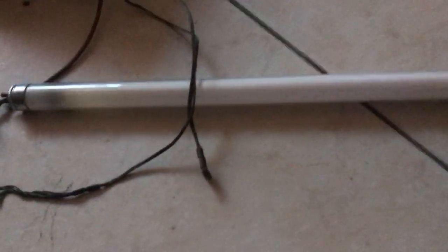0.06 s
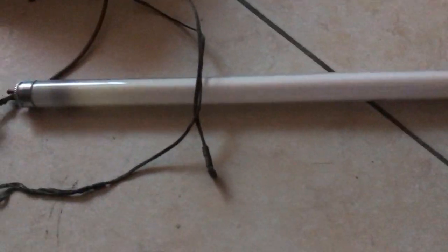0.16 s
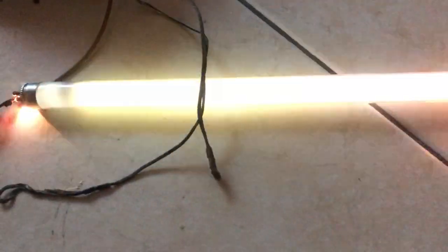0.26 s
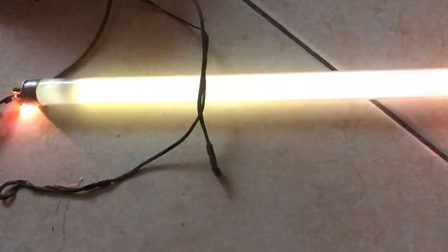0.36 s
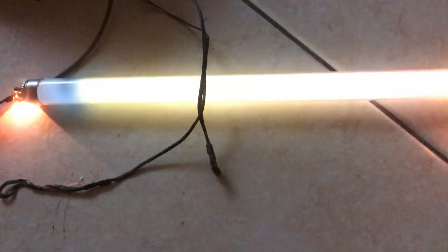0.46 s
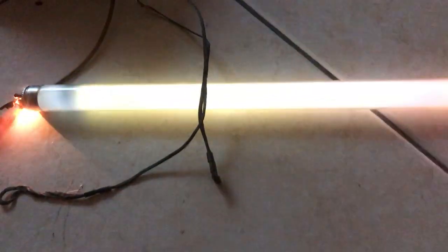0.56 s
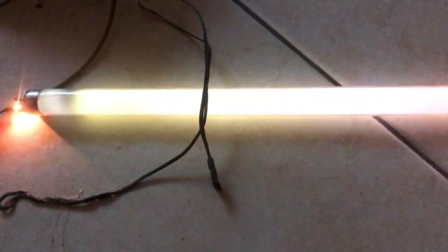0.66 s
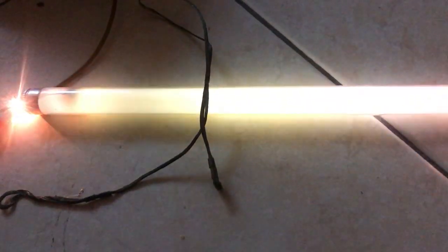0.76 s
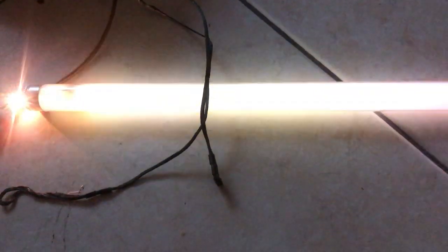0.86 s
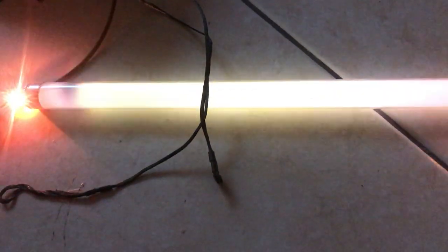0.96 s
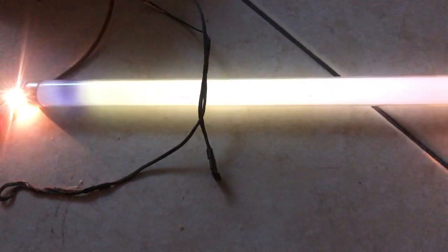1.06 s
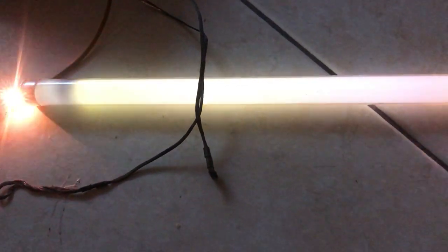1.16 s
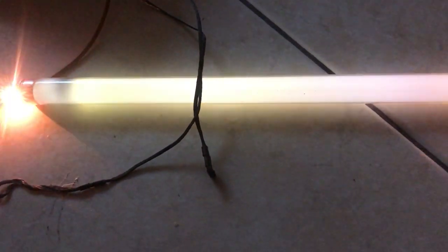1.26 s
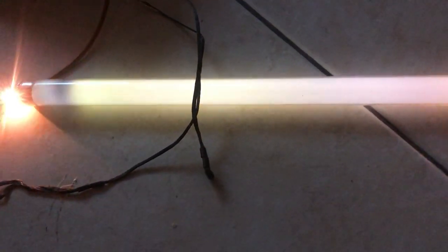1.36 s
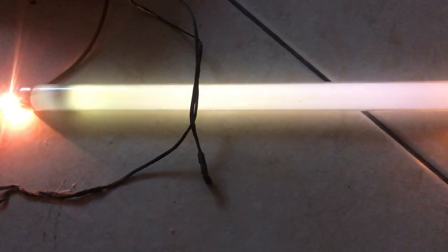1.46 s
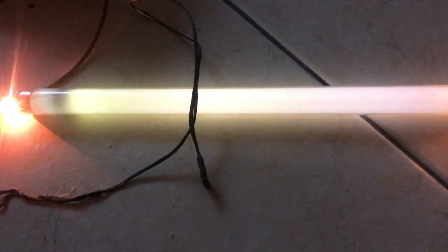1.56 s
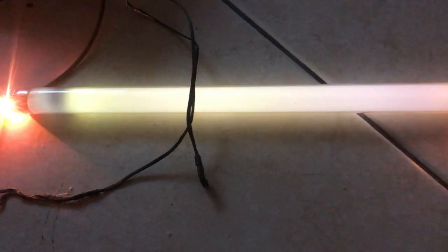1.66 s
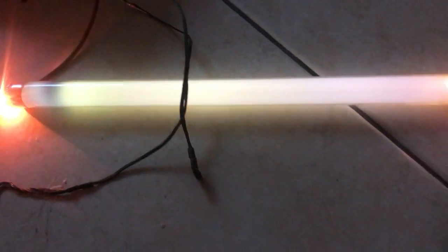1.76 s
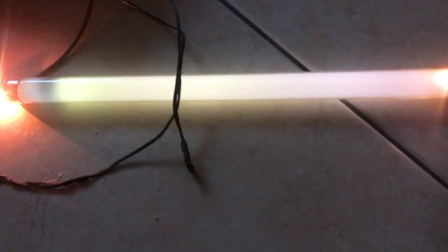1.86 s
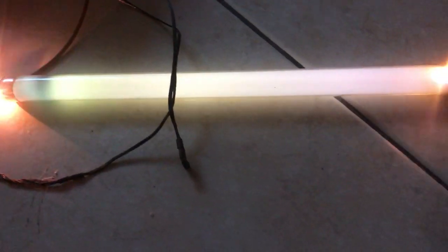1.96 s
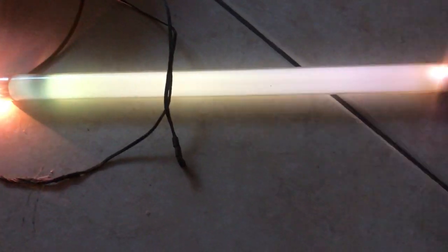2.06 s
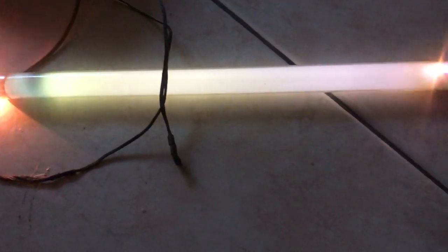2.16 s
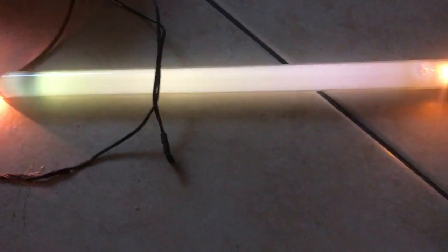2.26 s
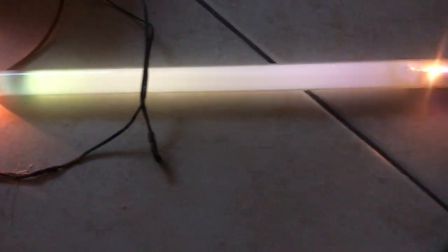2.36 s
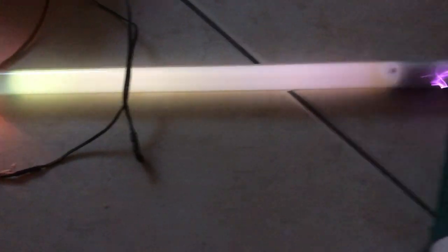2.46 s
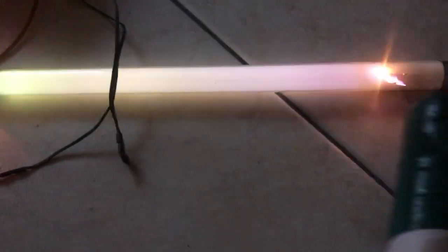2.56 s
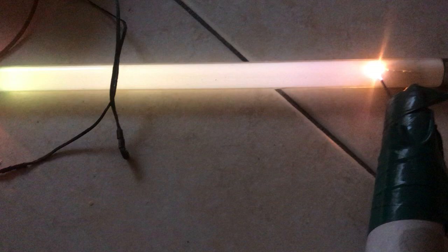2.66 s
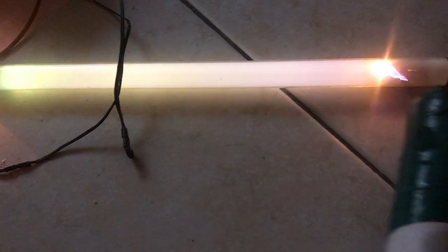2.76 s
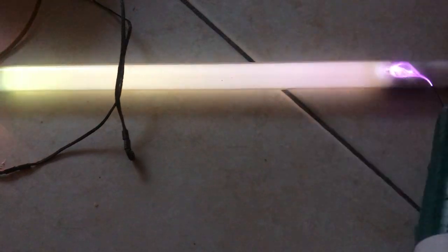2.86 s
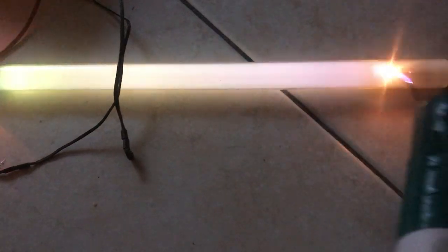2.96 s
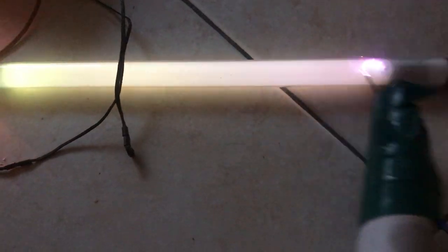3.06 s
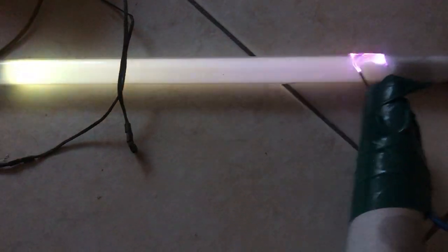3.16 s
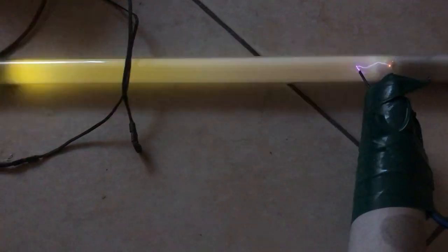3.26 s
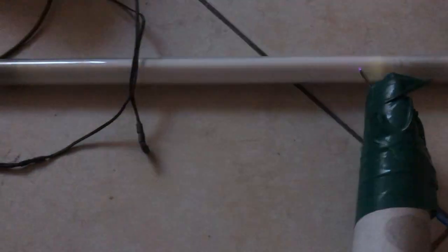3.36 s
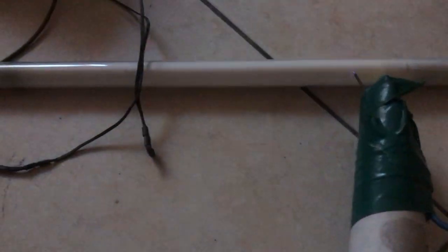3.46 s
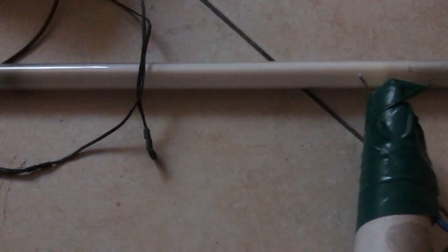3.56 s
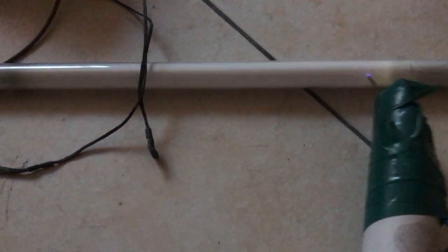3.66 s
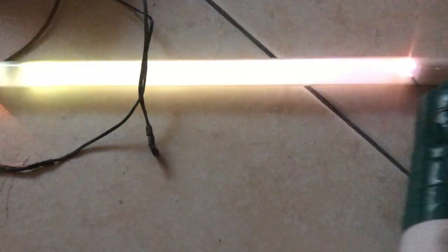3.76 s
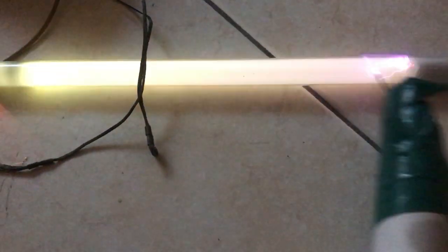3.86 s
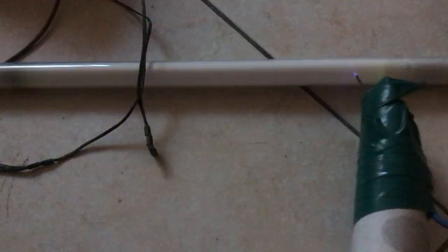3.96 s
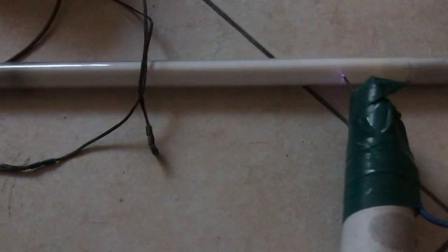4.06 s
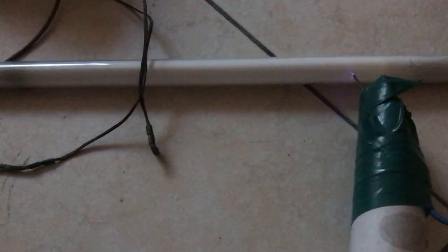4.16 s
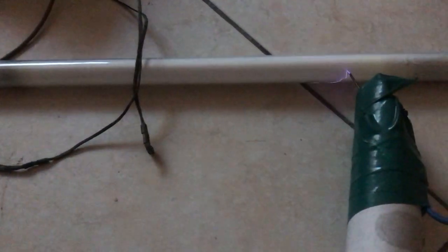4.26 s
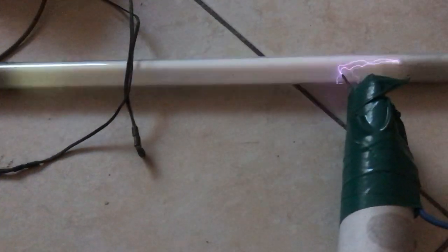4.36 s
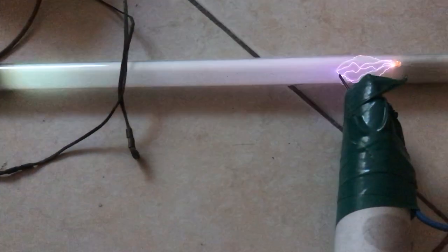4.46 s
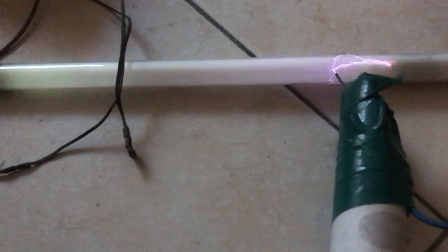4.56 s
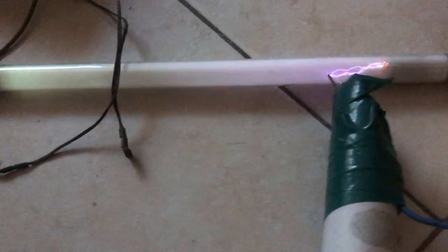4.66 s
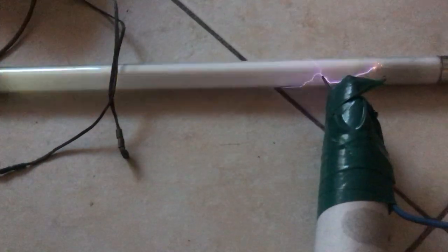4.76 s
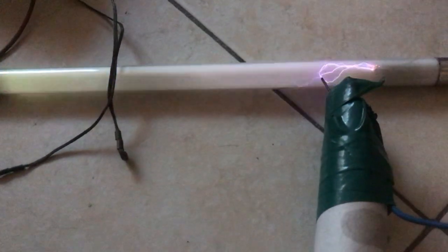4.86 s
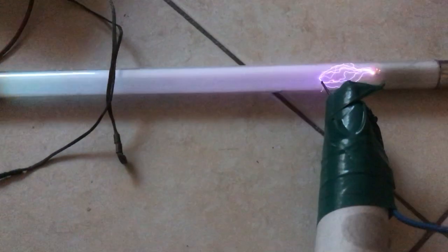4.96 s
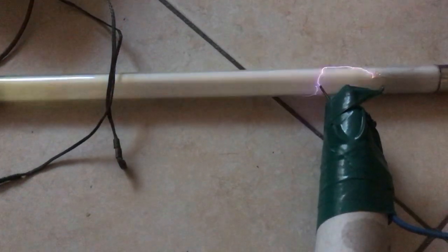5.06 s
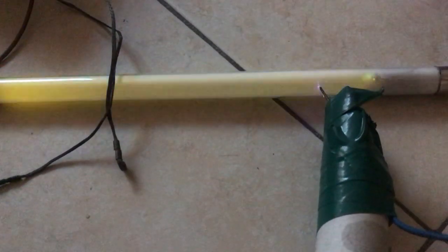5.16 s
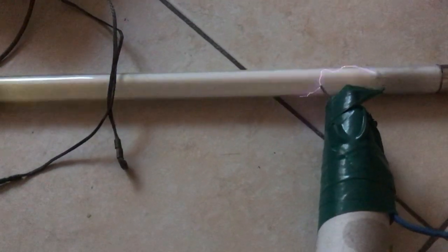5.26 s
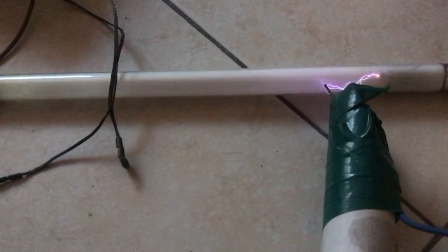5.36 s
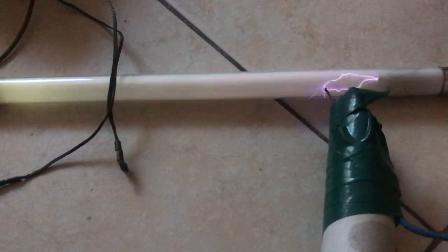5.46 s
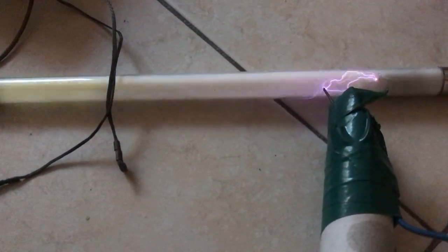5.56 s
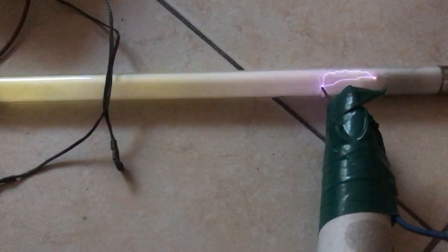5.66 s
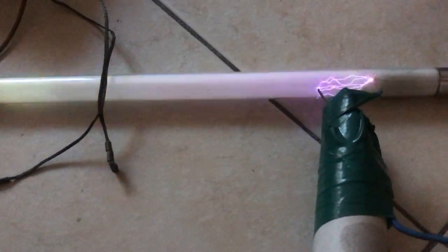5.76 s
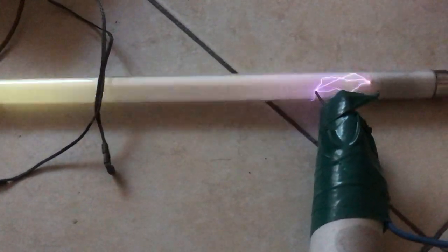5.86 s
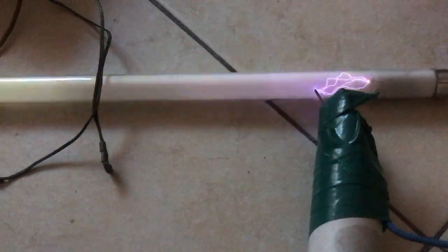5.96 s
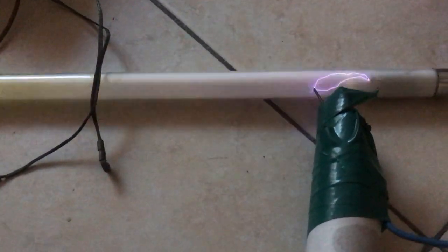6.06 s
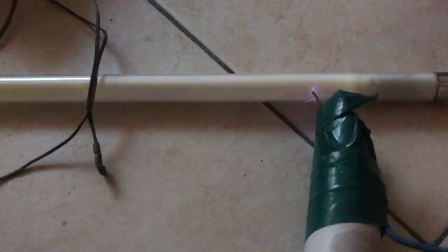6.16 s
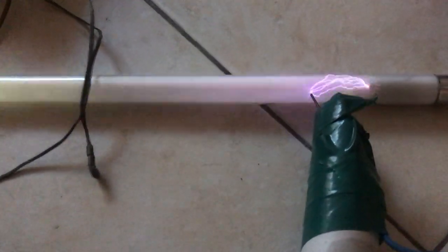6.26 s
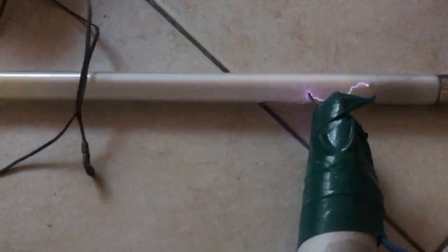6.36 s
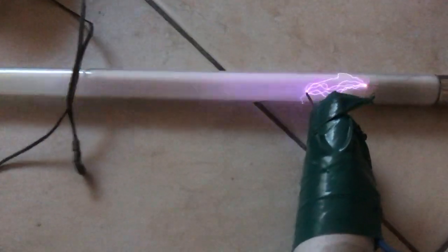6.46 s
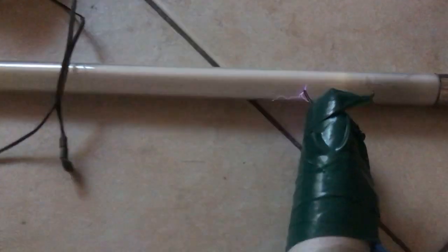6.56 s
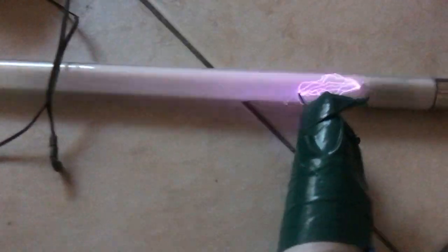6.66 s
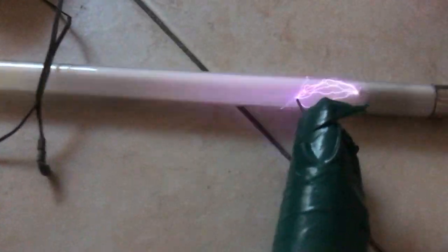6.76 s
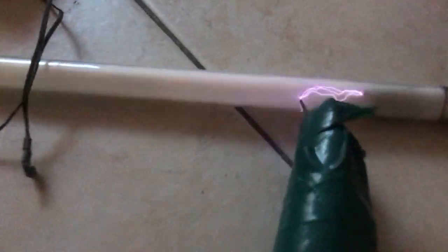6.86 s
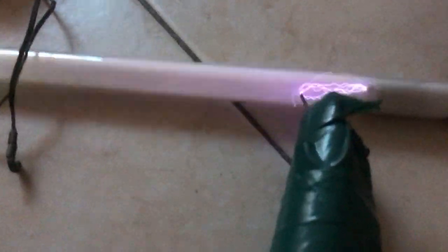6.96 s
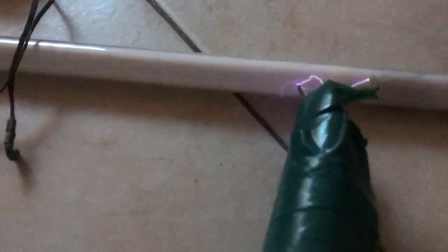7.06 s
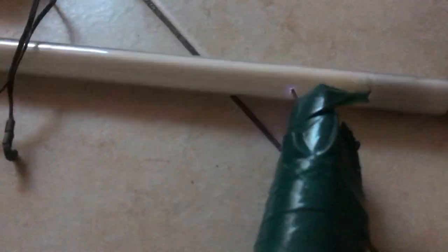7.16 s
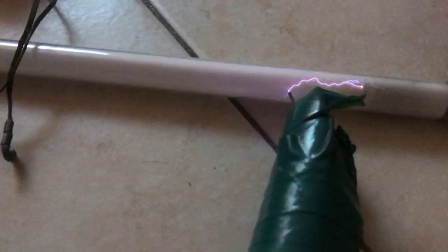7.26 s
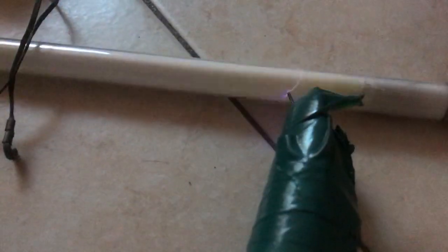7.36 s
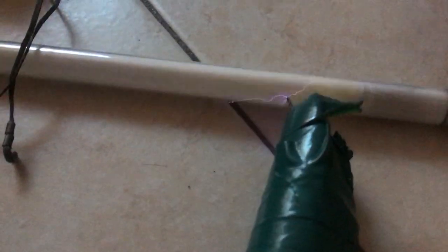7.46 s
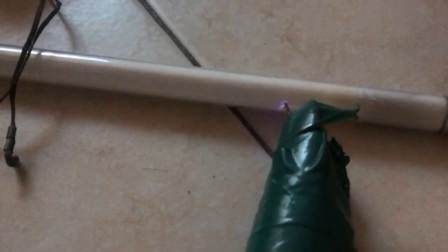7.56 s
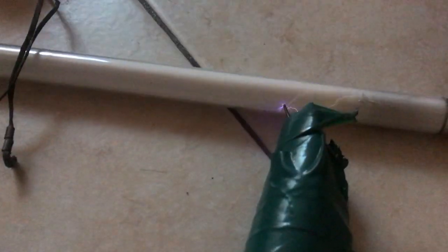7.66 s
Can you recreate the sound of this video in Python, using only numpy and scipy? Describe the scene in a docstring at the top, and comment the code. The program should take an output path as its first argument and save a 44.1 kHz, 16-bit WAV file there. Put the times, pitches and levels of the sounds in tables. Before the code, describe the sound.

A high-voltage wire is held to a glass lamp tube on a tiled floor. After a faint hiss, an arc strikes with a snap and sizzles with a thin, high whine. It swells, breaks off and returns for a moment. Then sharp sparks snap along the glass in fast, uneven volleys that grow thicker. The sound is close, with a short, hard room echo and faint creaks from the hand-held camera.

```python
"""A high-voltage lead held to a glass lamp tube on a tiled floor, heard close from a hand-held camera.
Corona hisses at the wire tip; then an arc strikes, sizzles and sings at the supply's switching frequency
and at fractions of it. It breaks off near 3.4 s and returns briefly. From 4.2 s sparks snap along the
glass in thickening volleys. The hard room answers each snap, and the camera body creaks in the hand."""
import sys
import numpy as np
from scipy import signal
from scipy.fft import rfft, irfft, next_fast_len
from scipy.io import wavfile
from scipy.ndimage import uniform_filter1d, minimum_filter1d, map_coordinates

SR = 44100
rng = np.random.default_rng(int(sys.argv[2]) if len(sys.argv) > 2 else 0)


def materialize(psi):
    """Save the field psi as 16-bit PCM at rate SR to the path in sys.argv[1].

    A 1-D psi becomes a single channel; in a 2-D psi each row is a channel.
    """
    bounded = np.clip(np.atleast_2d(psi).T, -1, 1)
    quanta = np.round(bounded * 32767).astype(np.int16)
    wavfile.write(sys.argv[1], SR, quanta)


N = 339551

# spark volleys along the glass: start_s, relative_level_db, length_ms
VOLLEYS = [(0.3135, -5.0, 4.0), (0.3203, -5.0, 4.2), (2.3024, -12.0, 1.0), (2.3146, -15.0, 0.0),
           (2.5104, -15.0, 0.0), (2.5151, -12.0, 0.3), (2.5436, -6.0, 1.7), (2.9366, -11.0, 0.0),
           (2.9674, -13.0, 0.0), (2.9694, -10.0, 2.0), (3.1846, -11.0, 0.0), (3.193, -6.0, 0.0),
           (3.2083, -6.0, 0.0), (3.212, -8.0, 0.6), (3.2144, -8.0, 0.0), (3.2221, -8.0, 0.0),
           (3.2269, -5.0, 0.0), (3.233, -5.0, 0.4), (3.2363, -4.0, 0.4), (3.2487, -9.0, 0.0),
           (3.2567, -4.0, 0.0), (3.2604, -6.0, 0.0), (3.2668, -9.0, 0.0), (3.2872, -11.0, 0.0),
           (3.3185, -9.0, 0.0), (3.3231, -10.0, 0.0), (3.3289, -9.0, 0.0), (3.3339, -8.0, 0.0),
           (3.339, -10.0, 0.0), (3.3434, -12.0, 0.0), (3.3493, -9.0, 0.4), (3.3524, -11.0, 1.5),
           (3.3606, -7.0, 0.0), (3.3729, -6.0, 0.0), (3.8124, -3.0, 11.9), (3.9788, -4.0, 2.4),
           (4.1956, -13.0, 0.0), (4.2186, -11.0, 0.0), (4.2454, -17.0, 0.0), (4.2898, -9.0, 0.0),
           (4.312, -15.0, 0.0), (4.3234, -11.0, 0.0), (4.346, -8.0, 0.0), (4.375, -4.0, 0.0),
           (4.4018, -6.0, 0.0), (4.4359, -4.0, 1.0), (4.4487, -4.0, 0.0), (4.4695, -5.0, 0.4),
           (4.4828, -4.0, 0.0), (4.4984, -11.0, 0.0), (4.5139, -4.0, 1.1), (4.5246, -4.0, 0.6),
           (4.5374, -5.0, 0.0), (4.5481, -12.0, 0.0), (4.5592, -5.0, 0.0), (4.5644, -5.0, 0.0),
           (4.5796, -3.0, 1.9), (4.5924, -5.0, 0.0), (4.603, -9.0, 0.0), (4.6247, -7.0, 0.0),
           (4.6298, -8.0, 0.0), (4.6567, -7.0, 0.0), (4.6704, -4.0, 0.0), (4.6803, -4.0, 1.2),
           (4.6905, -3.0, 0.0), (4.7168, -8.0, 0.0), (4.7316, -5.0, 1.8), (4.7466, -4.0, 0.0),
           (4.7568, -7.0, 0.0), (4.7732, -5.0, 0.0), (4.7798, -3.0, 0.9), (4.7978, -10.0, 0.0),
           (4.8201, -6.0, 0.0), (4.8719, -5.0, 0.6), (4.8896, -4.0, 0.7), (4.9, -3.0, 0.5),
           (4.9171, -4.0, 1.0), (4.9361, -3.0, 1.0), (4.9479, -6.0, 0.0), (4.9584, -14.0, 0.0),
           (4.9695, -4.0, 1.3), (4.9863, -6.0, 0.0), (4.9927, -10.0, 0.0), (5.0187, -3.0, 0.0),
           (5.0298, -4.0, 0.0), (5.0517, -3.0, 0.0), (5.0631, -12.0, 0.0), (5.0766, -7.0, 0.0),
           (5.0831, -4.0, 2.3), (5.1024, -4.0, 0.0), (5.1259, -8.0, 0.0), (5.133, -11.0, 0.0),
           (5.1472, -7.0, 0.0), (5.157, -4.0, 0.6), (5.1644, -6.0, 0.0), (5.1809, -4.0, 1.6),
           (5.2195, -9.0, 0.4), (5.2309, -4.0, 0.0), (5.2567, -4.0, 7.5), (5.2921, -12.0, 0.0),
           (5.2976, -6.0, 0.0), (5.3154, -3.0, 1.0), (5.328, -3.0, 0.0), (5.3502, -4.0, 1.3),
           (5.3698, -9.0, 0.0), (5.384, -8.0, 0.0), (5.4054, -3.0, 0.7), (5.4194, -5.0, 0.0),
           (5.4274, -9.0, 0.4), (5.4436, -10.0, 0.0), (5.4674, -3.0, 0.0), (5.4771, -4.0, 0.0),
           (5.4977, -4.0, 0.0), (5.5082, -3.0, 4.0), (5.5221, -11.0, 0.0), (5.5348, -5.0, 0.5),
           (5.548, -4.0, 0.0), (5.5569, -4.0, 0.4), (5.5712, -4.0, 1.1), (5.5863, -3.0, 0.0),
           (5.594, -4.0, 1.1), (5.6074, -5.0, 0.0), (5.6167, -4.0, 1.2), (5.6459, -4.0, 0.6),
           (5.6507, -5.0, 0.5), (5.6656, -4.0, 0.0), (5.6673, -4.0, 0.0), (5.6809, -4.0, 0.4),
           (5.6902, -11.0, 0.0), (5.6946, -6.0, 0.0), (5.7014, -4.0, 0.9), (5.7191, -4.0, 1.3),
           (5.733, -12.0, 0.0), (5.7395, -4.0, 2.7), (5.7528, -4.0, 0.0), (5.7596, -5.0, 0.0),
           (5.7624, -5.0, 0.5), (5.7796, -4.0, 1.5), (5.7868, -5.0, 0.5), (5.7892, -11.0, 0.0),
           (5.8026, -5.0, 1.4), (5.8064, -4.0, 1.5), (5.814, -12.0, 0.0), (5.8267, -4.0, 1.3),
           (5.8379, -4.0, 0.0), (5.8425, -6.0, 0.0), (5.8671, -5.0, 0.9), (5.8806, -5.0, 0.6),
           (5.8859, -4.0, 0.0), (5.8977, -3.0, 0.7), (5.9109, -3.0, 3.0), (5.9161, -3.0, 2.9),
           (5.9281, -3.0, 0.5), (5.9379, -6.0, 0.0), (5.9439, -4.0, 4.7), (5.956, -5.0, 0.0),
           (5.9669, -5.0, 0.0), (5.9723, -5.0, 0.9), (5.9873, -5.0, 1.7), (6.0001, -6.0, 0.0),
           (6.0028, -4.0, 2.1), (6.0108, -4.0, 0.0), (6.0143, -7.0, 0.0), (6.0165, -4.0, 0.8),
           (6.0259, -5.0, 0.8), (6.0316, -5.0, 2.2), (6.0442, -4.0, 0.0), (6.0527, -7.0, 0.0),
           (6.0572, -12.0, 0.0), (6.0723, -3.0, 1.5), (6.0868, -3.0, 2.4), (6.0973, -5.0, 0.0),
           (6.1269, -4.0, 0.0), (6.1374, -8.0, 0.0), (6.1503, -3.0, 2.1), (6.1722, -6.0, 0.0),
           (6.1758, -4.0, 0.0), (6.1931, -11.0, 0.0), (6.2022, -5.0, 1.0), (6.2105, -4.0, 0.8),
           (6.222, -14.0, 0.0), (6.2381, -13.0, 0.0), (6.2466, -3.0, 0.4), (6.2529, -5.0, 0.0),
           (6.2653, -4.0, 0.0), (6.2867, -4.0, 0.5), (6.2939, -13.0, 0.0), (6.3055, -5.0, 0.0),
           (6.312, -4.0, 0.0), (6.3157, -4.0, 0.0), (6.3209, -5.0, 0.6), (6.3294, -4.0, 0.5),
           (6.3417, -14.0, 0.0), (6.3456, -4.0, 0.0), (6.3564, -4.0, 1.2), (6.3695, -4.0, 0.0),
           (6.3732, -4.0, 0.0), (6.377, -4.0, 1.1), (6.4129, -4.0, 1.2), (6.436, -13.0, 0.0),
           (6.438, -13.0, 0.0), (6.4428, -5.0, 0.0), (6.4554, -4.0, 0.5), (6.4769, -6.0, 0.0),
           (6.4839, -13.0, 0.0), (6.5043, -4.0, 2.4), (6.5189, -4.0, 0.0), (6.5236, -12.0, 0.0),
           (6.5312, -4.0, 0.0), (6.5366, -3.0, 0.0), (6.5422, -3.0, 0.5), (6.5538, -4.0, 0.0),
           (6.5795, -4.0, 3.8), (6.5868, -7.0, 0.0), (6.59, -8.0, 0.0), (6.5966, -3.0, 0.6),
           (6.6172, -5.0, 0.0), (6.6203, -11.0, 0.0), (6.6395, -3.0, 0.0), (6.6549, -5.0, 0.0),
           (6.6693, -12.0, 0.0), (6.6744, -11.0, 0.0), (6.6919, -3.0, 1.5), (6.6958, -4.0, 0.4),
           (6.7188, -4.0, 2.3), (6.7459, -3.0, 0.6), (6.7635, -3.0, 0.0), (6.7699, -4.0, 1.0),
           (6.7826, -3.0, 1.5), (6.7882, -3.0, 0.6), (6.8052, -4.0, 0.0), (6.8256, -3.0, 1.5),
           (6.8522, -4.0, 1.1), (6.8602, -5.0, 0.0), (6.8703, -3.0, 0.0), (6.8732, -3.0, 0.5),
           (6.8817, -5.0, 0.0), (6.8834, -5.0, 0.0), (6.8932, -4.0, 0.5), (6.8954, -4.0, 0.0),
           (6.8998, -4.0, 2.1), (6.9085, -6.0, 0.0), (6.9241, -4.0, 0.0), (6.9318, -4.0, 0.0),
           (6.9402, -4.0, 1.1), (6.9473, -4.0, 0.0), (6.9543, -3.0, 1.4), (6.9577, -4.0, 0.0),
           (6.9685, -4.0, 0.6), (6.9803, -4.0, 0.0), (6.9883, -3.0, 1.9), (6.9997, -4.0, 0.0),
           (7.0042, -13.0, 0.0), (7.0091, -3.0, 0.0), (7.0193, -5.0, 0.0), (7.0266, -3.0, 0.0),
           (7.0405, -4.0, 0.8), (7.0559, -3.0, 0.0), (7.0579, -3.0, 0.5), (7.0634, -4.0, 0.0),
           (7.0714, -3.0, 0.5), (7.08, -3.0, 2.6), (7.0936, -3.0, 2.8), (7.1032, -4.0, 0.7),
           (7.1172, -3.0, 1.0), (7.127, -4.0, 0.5), (7.1319, -8.0, 0.0), (7.1463, -4.0, 0.0),
           (7.1793, -3.0, 0.0), (7.1903, -3.0, 0.9), (7.2002, -12.0, 0.0), (7.2087, -4.0, 0.5),
           (7.2248, -4.0, 0.5), (7.2335, -5.0, 0.0), (7.2412, -5.0, 0.0), (7.2602, -3.0, 0.4),
           (7.295, -13.0, 0.0), (7.3099, -7.0, 0.0), (7.3149, -3.0, 0.9), (7.324, -4.0, 1.0),
           (7.3503, -4.0, 0.0), (7.3572, -14.0, 0.0), (7.3709, -3.0, 0.0), (7.3855, -4.0, 0.9),
           (7.4007, -4.0, 0.0), (7.4215, -3.0, 0.0), (7.4312, -3.0, 1.0), (7.4478, -4.0, 0.0),
           (7.463, -3.0, 0.0), (7.4741, -14.0, 0.0), (7.4909, -5.0, 0.0), (7.5054, -4.0, 0.5),
           (7.52, -5.0, 0.0), (7.5332, -5.0, 0.6), (7.5373, -4.0, 0.0), (7.5488, -4.0, 0.0),
           (7.5636, -3.0, 0.0), (7.5837, -11.0, 0.0), (7.6179, -7.0, 0.0), (7.6307, -4.0, 0.0),
           (7.6488, -8.0, 0.0), (7.6606, -14.0, 0.0), (7.6924, -4.0, 0.0)]
# resonances of the camera body around the microphone: pitch_hz, width_hz, gain_db
BODY_MODES = [(917, 165, -2), (1736, 200, -4.5), (2217, 440, -4.5), (2550, 49, -9), (3175, 99, -2.5),
              (3643, 193, -3), (4417, 65, -6.5)]


def amp(db):
    """Decibels to gain."""
    return 10 ** (np.asarray(db) / 20)


def unit(x):
    """Scale to rms 1."""
    return x / np.sqrt(np.mean(np.abs(x) ** 2) + 1e-20)


def along(points, hz):
    """Interpolate (frequency_hz, value) points on a log frequency axis."""
    f, values = np.transpose(points)
    return np.interp(np.log(hz + 1), np.log(f + 1), values)


def gains(tables):
    """One gain curve per dB column of (time_s, level_db, ...) tables, silent between the tables."""
    t = np.arange(N) / SR
    return sum(np.array([amp(np.interp(t, times, db, -200, -200)) for db in columns])
               for times, *columns in map(np.transpose, tables))


def spells(rows, edge_s=0.0052):
    """One gain curve per dB column: each (start_s, length_s, level_db, ...) row rises, holds and falls."""
    t = np.arange(0, N + 40, 40) / SR
    shape = lambda s, length: np.clip(np.minimum(t - s + edge_s, s + length + edge_s - t) / edge_s, 0, 1)
    powers = sum((amp(db)[:, None] * shape(s, length)) ** 2 for s, length, *db in rows)
    return [np.interp(np.arange(N) / SR, t, np.sqrt(power)) for power in powers]


def wobble(rate):
    """A smooth random curve with rate knots a second."""
    knots = rng.standard_normal(int(N * rate / SR) + 4)
    return map_coordinates(knots, [np.arange(N) * rate / SR])


def filtered(x, response):
    """Filter x by a complex function of frequency."""
    size = next_fast_len(N + SR // 2)
    return irfft(rfft(x, size) * response(np.fft.rfftfreq(size, 1 / SR)), size)[..., :N]


def modes(table):
    """The causal response of (pitch_hz, width_hz, gain_db) resonances."""
    return lambda f: sum(amp(db) * 1j * f * width / (hz * hz - f * f + 1j * f * width)
                         for hz, width, db in table)


def hiss(response, flicker_db, rate):
    """Coloured noise of rms 1 whose level flickers."""
    return unit(filtered(amp(flicker_db * wobble(rate)) * rng.standard_normal(N), response))


def room_tone():
    """The room's air and the hand on the camera rumble faintly at the microphone."""
    # rumble over time: time_s, level_db
    levels = [(0.0, -62.5), (0.96, -67), (3, -64.5), (6.5, -60.5), (7.1, -57), (7.7, -62.5)]
    # its spectrum: frequency_hz, density_db
    spectrum = [(25, -2), (55, 0.5), (140, -0.5), (400, -10), (900, -20), (2000, -4.5), (4000, -55)]
    return gains([levels])[0] * hiss(lambda f: amp(along(spectrum, f)), flicker_db=2.5, rate=56)


def room_tail(x):
    """The hard room scatters echoes back, each frequency dying at its own speed."""
    # reverberation time: frequency_hz, t60_s
    decays = [(300, 0.64), (3000, 0.73), (15000, 0.19)]
    hz, t, noise = signal.stft(rng.standard_normal(SR // 2), SR, nperseg=64)
    answer = signal.istft(noise * amp(-60 * t / along(decays, hz)[:, None]), SR, nperseg=64)[1]
    return signal.fftconvolve(x, answer / np.linalg.norm(answer))[:N]


def camera_creaks():
    """The plastic body slips in the hand, right at the microphone: a hollow puff over one low push."""
    # single slips: start_s, relative_level_db, thump_offset_db
    single_slips = [(.525, -43, -17), (1.301, -47, -16), (1.778, -46, -22), (1.824, -46, -22),
                    (2.426, -41, -22), (2.778, -41, -21), (2.788, -51, -9), (2.889, -49, -21),
                    (2.929, -43, -18), (3.121, -40, -25), (6.852, -38.5, -14), (6.899, -47, -9),
                    (6.945, -33, -19), (6.978, -44, -8), (7.069, -32.5, -26), (7.099, -34.5, -18),
                    (7.208, -33.5, -16.5), (7.233, -32, -23), (7.314, -42, -10), (7.369, -42, -10),
                    (7.385, -33.5, -16)]
    # runs of evenly spaced slips: start_s, end_s, gap_s, relative_level_db
    judders = [(.442, .5, 0.022, -45.5), (1.385, 1.5, .019, -43.5), (1.84, 2.04, .022, -44),
               (2.279, 2.33, 0.016, -46.5), (2.484, 2.66, .021, -41), (2.684, 2.74, .024, -42),
               (2.953, 3.07, 0.023, -46.5), (3.146, 3.37, .022, -39.5), (6.865, 7.06, .021, -41)]
    judder_slips = [(s, db + rng.normal(0, 2.9), -22.5)
                    for start, end, gap, db in judders for s in np.arange(start, end, gap)]
    puffs, pushes, t = np.zeros(N + SR), np.zeros(N + SR), np.arange(SR // 20) / SR
    push = (1 - t / 0.0016) * np.exp(-t / 0.0018) * (1 - np.exp(-t / 0.00041))
    for s, db, thump_db in single_slips + judder_slips:
        puffs[round(s * SR):][:len(t)] += rng.standard_normal(len(t)) * amp(db + 4.5 - 60 * t / 0.032)
        pushes[round(s * SR):][:len(t)] += push * amp(db + thump_db + 20)
    return filtered(puffs[:N], modes([(840, 1600, 0)])) + pushes[:N]


def corona():
    """Streamers leave the wire tip while the arc is out: a thin hiss and a whistling one."""
    # one table per stretch of corona: time_s, thin_db, whistle_db
    levels = [
        [(0, -50, -33.5), (.1, -53, -34.5), (.22, -49.5, -38.5), (.3, -55, -35.5), (.315, -64, -23)],
        [(3.37, -35.5, -40), (3.43, -44.5, -38.5), (3.5, -51.5, -49.5), (3.76, -49.5, -45), (3.8, -40, -40)],
        [(3.985, -41.5, -38), (4.05, -51, -49.5), (4.2, -42.5, -40.5), (4.6, -43, -49), (6, -42, -58),
         (7.7, -41.5, -55)],
    ]
    # spectra of the two hisses: frequency_hz, density_db
    thin_spectrum = [(350, -57), (600, -11), (737, -8), (868, -12), (1770, -5), (3020, -5.5), (4420, 0.5),
                     (4870, -5), (5740, -4), (7650, -4.5), (15800, -8.5)]
    whistle_spectrum = [(180, -54), (300, -25), (454, -29), (974, -13.5), (4550, -19), (4870, -11.5),
                        (5940, 2), (7250, -2), (7620, -6.5), (9770, 0), (10400, -14), (11900, -0.5),
                        (15800, -15)]
    thin_gain, whistle_gain = gains(levels)
    thin_colour = lambda f: amp(along(thin_spectrum, f)) * (1 + modes(BODY_MODES)(f))
    thin = hiss(thin_colour, flicker_db=3.5, rate=220)
    whistle = hiss(lambda f: amp(along(whistle_spectrum, f)), flicker_db=2, rate=240)
    return thin_gain * thin + whistle_gain * whistle


def wander(x, depth_db):
    """Bands of a few hundred Hz swell and sink for a tenth of a second or so, as the arc wanders."""
    bands = signal.stft(x, nperseg=512)[2]
    patches = uniform_filter1d(rng.standard_normal(bands.shape), size=4, axis=0)
    patches = uniform_filter1d(patches, size=24, axis=1)
    return unit(signal.istft(bands * amp(depth_db * unit(patches)), nperseg=512)[1][:N])


def arc_sizzle(high_gain, low_gain):
    """The burning arc sizzles: a bright wandering layer and a lower one that rings the camera body."""
    # spectra of the two layers: frequency_hz, density_db
    high_spectrum = [(2650, -42.5), (4500, -17.5), (5310, -11.5), (5800, -13.5), (7030, -5.5), (7820, -1.5),
                     (9200, 0), (9850, -3.5), (11000, -7.5), (13100, -11.5), (14500, -54)]
    low_spectrum = [(240, -44), (400, -35), (954, -18), (1920, -15.5), (2590, -3.5), (3770, -5.5),
                    (4150, 2), (5200, -5), (6760, -29), (11400, -120)]
    high = wander(hiss(lambda f: amp(along(high_spectrum, f)), flicker_db=0, rate=230), depth_db=2.5)
    low_colour = lambda f: amp(along(low_spectrum, f)) * (.5 + modes(BODY_MODES)(f))
    low = hiss(low_colour, flicker_db=2.5, rate=200)
    return amp(1.5) * high_gain * high + amp(-1.54) * low_gain * low


def recharge(recovery_s):
    """A strong volley empties the gap: the arc's gain drops to a tenth, then swells back."""
    t = np.arange(N) / SR
    ends = np.sort([s + ms / 1000 for s, db, ms in VOLLEYS if db > -12])
    since = t - ends[np.clip(np.searchsorted(ends, t) - 1, 0, None)]
    return np.where(since > 0, 1 - .9 * np.exp(-(since / recovery_s) ** 2), 1)


def arc(supply_hz=15565):
    """The arc pulses once a supply cycle; patterns that repeat every 2, 3 or 8 cycles sing below it."""
    # one table each time the arc is drawn, relative levels: time_s, whine_db, sizzle_db
    burns = [
        [(.315, -33, -38.5), (.52, -36, -34), (.56, -27, -37.5), (.7, -34, -34.5), (.83, -40, -35.5),
         (.86, -36, -67), (.92, -35, -56), (.95, -30, -43), (.99, -27, -40), (1.02, -35, -36.5),
         (1.17, -38, -35.5), (1.45, -38, -32.5), (1.55, -46, -34.5), (1.72, -44, -36), (1.85, -36, -34),
         (2.12, -36, -36), (2.17, -31, -35.5), (2.5, -30.5, -33.5), (2.89, -38, -36.5), (2.925, -24, -31.5),
         (3.08, -39, -38), (3.16, -25, -36), (3.2, -23, -26.5), (3.23, -28, -26.5), (3.37, -32, -28.5)],
        [(3.795, -46, -37), (3.83, -30, -30), (3.865, -29, -42), (3.9, -37, -43), (3.94, -28, -38),
         (3.983, -35, -35)],
    ]
    # flares as it jumps or stretches, relative levels: start_s, length_s, sizzle_db, low_sizzle_db
    flares = [(.315, 0.015, -19.5, -37.5), (.505, 0.025, -38, -53), (.783, .01, -32, -45.5),
              (.817, .008, -25, -40), (.935, 0.021, -31, -38.5), (1.27, 0.037, -40, -47.5),
              (2.26, 0.063, -37.5, -46), (2.42, 0.23, -51, -45), (2.5, 0.062, -47, -40),
              (2.93, 0.081, -36, -44.5), (2.955, 0.028, -36, -44), (3.12, 0.072, -42, -52),
              (3.805, 0.034, -26, -41), (3.965, 0.015, -30.5, -40)]
    # spells locked to every second cycle: start_s, length_s, relative_level_db
    locks = [(.335, 0.036, -36), (.785, .032, -29.5), (1.012, 0.068, -30), (1.08, .2, -44),
             (1.55, 0.62, -38.5), (2.7, 0.186, -37), (3.13, .07, -35), (3.2, 0.16, -28.5),
             (3.825, .05, -39), (3.92, .06, -38.5)]
    whine_gain, steady = gains(burns)
    flare, low_flare = spells(flares)
    lock, = spells(locks)
    sizzle_gain = np.hypot(steady, flare)
    low_gain = np.hypot(amp(-51.5) * (steady / amp(-35)) ** 1.6, low_flare)  # grows 1.6 dB per dB
    half_gain = np.hypot(lock, amp(-14) * steady)
    locked = uniform_filter1d(lock, size=400) > amp(-42)
    third_gain = steady * amp(np.where(locked, -14.5, -9.5))
    phase = 2 * np.pi * supply_hz * np.arange(N) / SR

    def tone(ratio, slip_rad, flicker_db=2):
        return amp(flicker_db * wobble(120)) * np.sin(ratio * phase + slip_rad * wobble(220))

    def band(ratio, width_hz):
        return lambda f: modes([(ratio * supply_hz, width_hz, 0)])(f) ** 2

    whine = np.sqrt(2) * whine_gain * tone(1, slip_rad=.2, flicker_db=2.5)
    half = amp(3) * half_gain * tone(1 / 2, slip_rad=.75)
    # the three-cycle pattern keeps losing step, so it sings in rough bands
    thirds = hiss(lambda f: band(1 / 3, 200)(f) - band(1.04 / 3, 260)(f), flicker_db=3, rate=25)
    thirds += hiss(band(2 / 3, 700), flicker_db=3, rate=60)
    # the eight-cycle pattern holds for short spells
    eighth_gain = sizzle_gain * amp(-16 + 6 * wobble(25))
    eighths = sum(amp(db) * tone(k / 8, slip_rad=.6) for k, db in ((3, -10), (5, 0), (6, -6)))
    # a long, fierce arc sputters in puffs around half the supply frequency
    sputter = amp(58) * half_gain * steady ** 2 * hiss(band(1 / 2, 2100), flicker_db=3, rate=340)
    patterns = half + third_gain * thirds + eighth_gain * eighths + sputter
    return whine + recharge(recovery_s=.0025) * (patterns + arc_sizzle(sizzle_gain, low_gain))


def strikes(restrike_ms=.8, jitter_s=.00015, strays_per_s=20):
    """Impulses of short, sharp sparks and long, dull ones: quick restrikes, and faint strays late on."""
    short, long = np.zeros(N + SR), np.zeros(N + SR)
    for s, db, ms in VOLLEYS:
        chance = rng.standard_normal((40, 2))
        dull_db = -7.5 + 1.1 * (-5 - db) + 2.5 * chance[-1, 0]  # weaker volleys are duller
        count = int(np.ceil(ms / restrike_ms)) + 1
        times = s + np.linspace(0, ms / 1000, count) + jitter_s * chance[:count, 0] * (count > 2)
        sizes = amp(db + 1.5 * chance[:count, 1] * (count > 1))
        at = np.round(times * SR).astype(int)
        short[at] += sizes / (1 + amp(2 * dull_db))
        long[at] += sizes / (1 + amp(-dull_db))
    stray_fires = (rng.random(N) < strays_per_s / SR) * (np.arange(N) > 4.4 * SR)
    strays = stray_fires * amp(-25 + 3 * rng.standard_normal(N))
    return short[:N] + strays, long[:N] + strays


def sparks():
    """Each strike sends a shock wave, push then pull, with hard echoes and a short scatter, new each time."""
    # the microphone's treble resonance: pitch_hz, width_hz, gain_db
    microphone = [(12220, 8160, 2.5)]
    # echoes off the tiles and things nearby: delay_ms, gain_db
    echoes = [(.52, -15), (1.3, -15), (3.0, -20)]
    # spectrum of the scatter close by: frequency_hz, density_db
    scatter_spectrum = [(300, -33.5), (1250, -8.5), (2800, 0), (5000, -2.5), (8500, 2), (11000, -25),
                        (16000, -1)]

    def shock(width_us):
        pulse = lambda f: np.exp(-(2 * np.pi * f * width_us * 1e-6) ** 2 / 2)
        return lambda f: 1j * f * width_us * 1e-5 * pulse(f) * modes(microphone)(f)

    short, long = strikes()
    snaps = amp(7.5) * filtered(short, shock(width_us=9)) + amp(17) * filtered(long, shock(width_us=34))
    reflections = lambda f: 1 + sum(amp(db) * np.exp(-2j * np.pi * f * ms / 1000) for ms, db in echoes)
    t = np.arange(SR // 10) / SR
    power_decay = amp(2 * (-24 - 60 * t / .012)) + amp(2 * (-31 - 60 * t / .04))
    scatter_power = np.abs(signal.fftconvolve((short + long) ** 2, power_decay)[:N])
    scatter = hiss(lambda f: amp(along(scatter_spectrum, f)), flicker_db=1.5, rate=1500)
    return filtered(snaps, reflections) + np.sqrt(scatter_power) * scatter


def scene():
    """Sparks and arc fill the room and ring the camera body, over corona, creaks and room tone, in mono."""
    snaps, burning = sparks(), arc()
    reverb = amp(-16.5) * room_tail(snaps) + amp(-13) * room_tail(burning)
    at_camera = filtered(snaps + burning + reverb, lambda f: 1 + modes(BODY_MODES)(f))
    return (at_camera + corona() + camera_creaks() + room_tone())[None]


def record(dry):
    """The microphone drops the deepest bass and the highest treble; a fast limiter holds the peaks."""
    bass_hz, top_hz, ceiling = 28, 16600, .72
    passband = lambda hz: hz ** 2 / (hz ** 2 + bass_hz ** 2) / (1 + (hz / top_hz) ** 80)
    sound = filtered(dry, passband)
    envelope = np.abs(signal.hilbert(sound, next_fast_len(N))[:, :N])
    gain = minimum_filter1d(1 / (1 + (envelope / ceiling) ** 6) ** (1 / 6), size=15)
    return filtered(sound * uniform_filter1d(gain, size=9), passband)


dry = scene()
out = record(dry)
materialize(out)
```